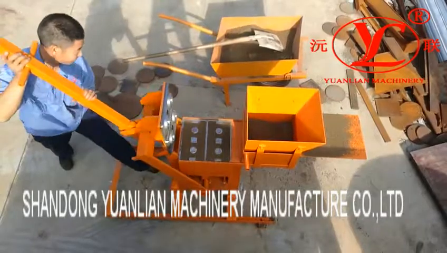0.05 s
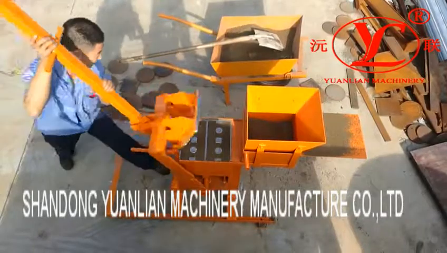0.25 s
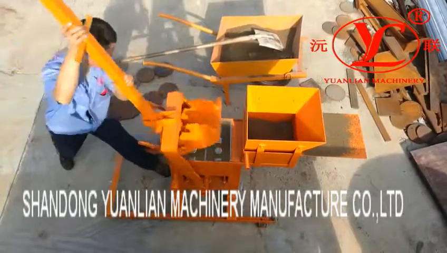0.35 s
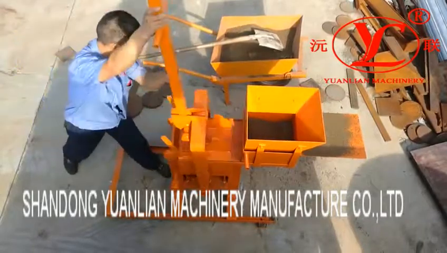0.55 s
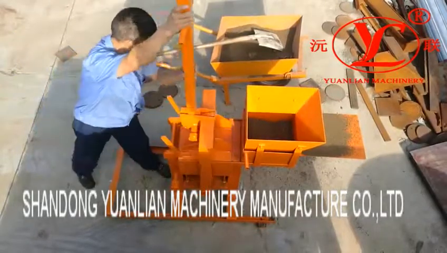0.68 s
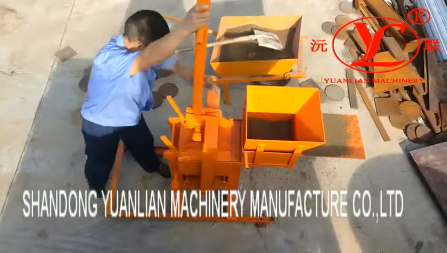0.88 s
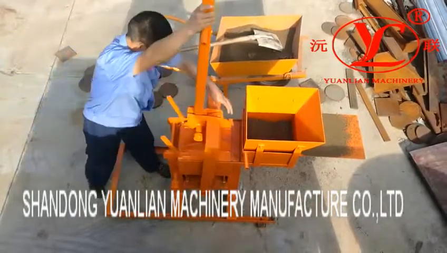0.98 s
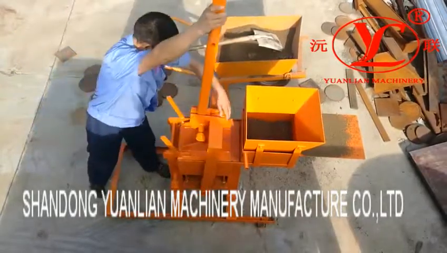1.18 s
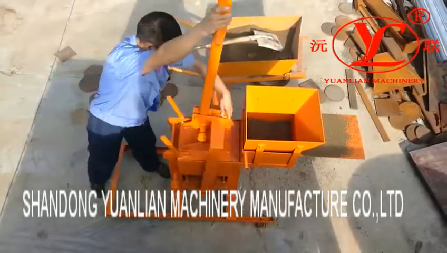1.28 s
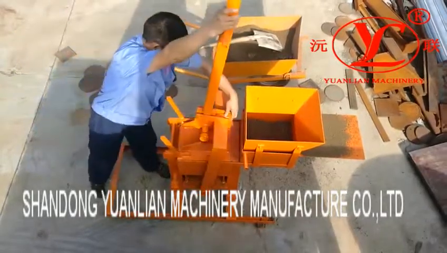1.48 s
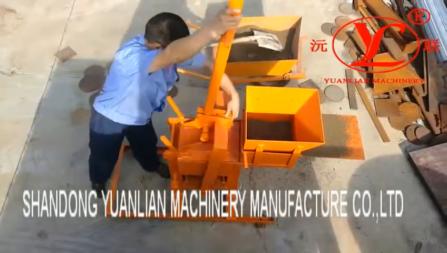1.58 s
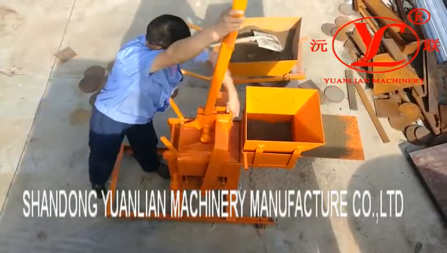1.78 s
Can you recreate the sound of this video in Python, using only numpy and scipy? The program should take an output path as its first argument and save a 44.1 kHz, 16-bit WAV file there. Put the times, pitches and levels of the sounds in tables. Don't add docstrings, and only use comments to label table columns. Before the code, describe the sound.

A heavy steel press lid slams onto its mould at about 0.24 s: several contacts crowd into one loud, clipped clank with crushed grit and a dull ground thud. Small bright bounce ticks follow at 0.36 s, faint knocks until 0.5 s, then a low ring sagging in pitch. A distant grinder hisses and squeals over low rumble throughout; two faint taps near 1.53 s. Open yard, short diffuse echo.

```python
import sys
import numpy as np
from scipy import signal
from scipy.fft import rfft, irfft, next_fast_len
from scipy.io import wavfile
from scipy.ndimage import uniform_filter1d

SR = 44100
rng = np.random.default_rng(int(sys.argv[2]) if len(sys.argv) > 2 else 0)


def unload_wav(signal):
    wavfile.write(
        sys.argv[1],
        SR,
        np.round(np.clip(np.atleast_2d(signal).T, -1, 1) * 32767).astype(np.int16),
    )


def attenuation_scalar(level_db):
    decades = np.asarray(level_db, float) / 20
    return 10 ** decades


N = 81585
M = next_fast_len(N)
T = np.arange(N) / SR
HZ = np.maximum(np.arange(M // 2 + 1) * SR / M, 1)

# pitch_hz, level_db
TOWN_SPECTRUM = [(12, -40), (20, -4.5), (87, -4.5), (231, -6.5), (264, -3), (582, -14), (897, -7),
                 (1100, -6.5), (1800, -10.5), (2340, -25), (3960, -120)]
TOWN_DB = -51

# pitch_hz, width_hz, level_db
DISC_LOW_MODES = [(1959, 8.5, 1), (2112, 18, 0), (2286, 24, -6.5), (2325, 26, -4), (2380, 6.2, -15),
                  (2436, 14, -6), (2560, 20, -30), (2770, 28, -9), (2880, 11, -16), (3457, 23.5, -4.5),
                  (3540, 45, -6.5), (3663, 32, -14), (4327, 17, -4), (4440, 9.3, -4.5)]
# pitch_hz, width_hz, level_db
DISC_HIGH_MODES = [(5347, 85, -0.5), (6160, 50, -7.5), (7487, 124, -2.5), (8210, 126, -8.5),
                   (10100, 235, -14), (10900, 230, -18), (11440, 170, -29)]
# start_s, length_s, pitch_hz, level_db
SING_EVENTS = [(0.035, 0.24, 2021, -32.5), (0.11, 0.4, 2000, -47), (0.14, 0.18, 2330, -41),
               (0.4, 0.35, 2380, -44.5), (0.548, 0.41, 1954, -48), (0.7, 0.12, 2480, -43),
               (0.723, 0.27, 2360, -46), (0.982, 0.091, 2862, -42.5), (1.097, 0.13, 917, -53.5),
               (1.136, 0.12, 2335, -44), (0.96, 0.083, 2414, -41.5), (1.33, 0.33, 2291, -43),
               (1.659, 0.11, 2250, -41), (0.41, .22, 3405, -45), (1.255, 0.044, 3490, -42.5),
               (0.093, .14, 3470, -43), (.13, 0.12, 3360, -47), (0.04, .15, 5240, -39.5),
               (.43, .18, 5230, -50), (.86, 0.084, 2465, -46), (1.13, .04, 2300, -53),
               (1.15, 0.065, 3700, -47), (1.05, 0.065, 3395, -46.5), (1.0, .1, 2095, -52.5)]
# pitch_hz, level_db
HISS_SPECTRUM = [(1500, -55), (1850, -10), (2300, -3.5), (3800, -8.5), (5000, -10.5), (8600, -13.5),
                 (11500, -32.5), (15400, -50)]
DISC_DB, DISC_HIGH_DB, HISS_DB = -40, -7, -40.5
DISC_SWAY_DB, DISC_SWAY_RATE_HZ = 2.5, 9
CHATTER_DB, CHATTER_RATE_HZ = 0.5, 110
FINE_DB, FINE_WIDTH_HZ, FINE_SWAY_DB = 5, 14, 4
SING_WIDTH_HZ, SING_ROUGH, SING_EDGE_S, SING_LAG_S = 10, 0.55, 0.029, 0.00031
CUT_LOW_HZ = 1590

# start_s, level_db, push_ms, base_weight_db, frame_weight_db
CONTACT_EVENTS = [(0.2375, -24, 0.35, -14, 4.5), (0.2404, -18, 0.15, -16, 2), (0.2448, -6, 0.21, -16.5, 1),
                  (0.2495, -8, 0.51, -16.5, -1), (0.2535, -13, 0.37, -14, -0.5), (0.2578, -8, 0.25, -7, 0),
                  (0.2605, -8.5, .2, -9, -2), (0.2635, -6.5, 0.25, -5.5, 0), (0.2665, -8, 0.18, -3.5, -1.5),
                  (0.2705, -11.5, 0.25, -7.5, -1), (0.2745, -12.5, 0.24, -7.5, -2.5),
                  (0.278, -11.5, 0.23, -8.5, -4.5), (0.283, -20.5, 0.27, -5, -5),
                  (0.2885, -20, 0.36, -4.5, 1.5), (0.3575, -31, 0.19, -18, -15),
                  (0.3645, -27.5, 0.11, -18, -15), (0.392, -30.5, 0.25, -3, -3), (0.407, -36, 0.3, 10, -1),
                  (0.445, -41, 0.39, 6.5, -13.5), (0.488, -47, 0.55, 8.5, -13),
                  (1.529, -36, 0.5, -10.5, -0.5), (1.549, -42.5, 0.43, -5, 0)]
BASE_PITCH_HZ = [50, 181, 255, 287, 305, 400, 553]
# level_db, t60_s, left_over_right_db
BASE_MODES = [(-8, 0.2, -2), (-15, 0.29, 2), (-15, 0.12, -1), (-3, 0.26, -1), (-4, 0.13, -1),
              (-20.5, 0.047, -2), (-20.5, 0.068, -1)]
FRAME_PITCH_HZ = [1035, 1083, 1153, 1198, 1403, 1529, 1607, 1776, 1962, 2063, 2190, 2240, 2401]
# level_db, t60_s, left_over_right_db
FRAME_MODES = [(-6.5, 0.07, 0), (-7.5, 0.074, -5), (2.5, 0.08, -1), (0, 0.14, -1), (-4, 0.06, 0),
               (-6, 0.048, 8), (-13, 0.066, 0), (-20, 0.12, 5), (-3.5, 0.087, 0), (-10.5, 0.073, -3),
               (-5.5, 0.054, -3), (-4.5, 0.12, 8), (-1.5, 0.11, 4.5)]
LID_PITCH_HZ = [2467, 2855, 3280, 3755, 3985, 4335, 4780, 5060, 5800]
# level_db, t60_s, left_over_right_db
LID_MODES = [(-5.5, 0.09, 4), (-8, 0.065, 7.5), (-15, 0.05, 3), (-9, .045, -7), (-4, 0.05, -2.5),
             (-9.5, 0.04, 0), (-4.5, 0.051, 5.5), (-13, 0.046, -7), (-15.5, .04, -4)]
STEEL_DB, STEEL_LOW_HZ, MODE_SCATTER_DB = -35, 163, 3

# pitch_hz, level_db
GRIT_SPECTRUM = [(100, -30), (287, -7), (725, -17.5), (1150, -6), (2410, -3.5), (3240, -11), (5000, -12),
                 (10500, -22), (15400, -40)]
GRIT_DB, GRIT_T60_S, GRIT_RISE_S, GRIT_SPIKE_DB = -28.5, 0.025, 0.002, 2

# pitch_hz, level_db
THUD_SPECTRUM = [(60, -44), (130, -21), (190, -1), (300, 3), (450, -7), (800, -11.5), (1500, -14),
                 (2500, -50)]
# start_s, level_db, t60_s
LOW_RUMBLE_TAIL = (0.34, -20, 1.6)
THUD_DB, THUD_T60_S, THUD_SQUEEZE = -40, 0.35, 0.47

# start_s, level_db
TICK_EVENTS = [
    (.3575, -27),
    (.3645, -24),
    (.369, -34),
]
TICK_T60_S, TICK_LOW_HZ = 0.028, 2200

# start_s, from_hz, to_hz, glide_s, level_db, t60_s
BASE_SAG = (0.57, 302.5, 268, 0.23, -41.5, 1.3)

YARD_DB, YARD_T60_S, YARD_GAP_S = -24, 0.58, 0.022
YARD_LOW_HZ, YARD_TOP_HZ = 146, 2540

# pitch_hz, likeness (-1 to 1)
FAR_LIKENESS = [(60, 1.0), (130, 1.3), (290, 0.35), (640, -0.06), (1410, -0.33), (3090, 0.05),
                (6800, -0.02), (15000, -0.04)]
# pitch_hz, left_over_right_db
FAR_PORT_DB = [(60, 1), (110, -1), (200, 0), (380, -1.5), (700, -4), (1290, 0), (2380, 11.5), (4390, -2.5),
               (8110, 2), (15000, -4)]
# pitch_hz, likeness (-1 to 1)
NEAR_LIKENESS = [(60, .98), (300, .97), (600, .75), (1200, .9), (2000, .5), (3100, 0), (15000, 0)]
# pitch_hz, left_over_right_db
NEAR_BALANCE_DB = [(60, 0), (380, -1), (700, 1), (1290, 0), (2380, 7), (4390, -2), (8110, -1), (15000, -3)]
NEAR_LAG_S = 0.00007
# start_s, gain_db
RECORDER_GAIN = [(0, 9.5), (.235, 8.5), (.29, 3.5), (.5, 4.5), (.8, 1), (1.2, 2), (1.85, 2)]
CLIP_AT = 1


def along(table):
    table = np.array(table, float)
    return np.interp(np.log(HZ), np.log(table[:, 0]), table[:, 1])


def level(x, db):
    return x * attenuation_scalar(db) / np.sqrt(np.mean(x ** 2))


def colour(x, table):
    return irfft(rfft(x, M) * attenuation_scalar(along(table)), M)[..., :N]


def decay(start_s, db, t60_s):
    return (T > start_s) * attenuation_scalar(db - 60 * np.maximum(T - start_s, 0) / t60_s)


def walk(rate_hz):
    k = int(SR / rate_hz)
    held = np.repeat(rng.standard_normal(512)[:N // k + 1], k)
    return 1.3 * uniform_filter1d(uniform_filter1d(held, k), k)[:N]


def ring(x, hz, t60_s):
    r = np.exp(-np.log(1000) / (max(t60_s, 0.003) * SR))
    w = 2 * np.pi * hz / SR
    return signal.lfilter([0, r * np.sin(w)], [1, -2 * r * np.cos(w), r * r], x)


def hum(noise, hz, width_hz):
    return level(ring(noise, hz, np.log(1000) / (np.pi * max(width_hz, 2))), 0)


def pair(likeness, shape=1, gate=1):
    c = np.clip(along(likeness), -1, 1)
    mid, side = rfft(rng.standard_normal((2, N)) * gate, M) / np.sqrt(2)
    sign = np.array([[1], [-1]])
    both = mid * np.sqrt(1 + c) + side * np.sqrt(1 - c) * sign
    return irfft(shape * both, M)[:, :N]


def ports(x, table, lag_s):
    port = attenuation_scalar(along(table) / 2) * np.exp(-1j * np.pi * HZ * lag_s)
    return irfft(rfft(x, M) * np.array([port, 1 / port]), M)[:, :N]


def town():
    rumble = colour(pair(FAR_LIKENESS), TOWN_SPECTRUM + [(2600, -60)])
    return level(rumble, TOWN_DB) * attenuation_scalar(0.6 * walk(5.8))


def disc():
    cut = pair(FAR_LIKENESS)
    high = [(hz, width_hz, db + DISC_HIGH_DB) for hz, width_hz, db in DISC_HIGH_MODES]
    total = 0
    for hz, width_hz, db in DISC_LOW_MODES + high:
        swell = attenuation_scalar(db + 10 * np.log10(width_hz) + DISC_SWAY_DB * walk(DISC_SWAY_RATE_HZ))
        total = total + swell * hum(cut, hz, width_hz)
    return level(total, DISC_DB)


def fine_modes():
    k = int(FINE_WIDTH_HZ * M / SR)
    thicket = uniform_filter1d(uniform_filter1d(rng.standard_normal(len(HZ)), k), k)
    shape = attenuation_scalar(along([(1200, -39)] + HISS_SPECTRUM) + FINE_DB * thicket / thicket.std())
    return pair(FAR_LIKENESS, shape) * attenuation_scalar(FINE_SWAY_DB * walk(5.89))


def hiss():
    total = sum(fine_modes() for _ in range(4))
    total = total / uniform_filter1d(np.abs(total).mean(axis=0), SR // 8)
    return level(total, HISS_DB)


def grinder():
    cut = (disc() + hiss()) * attenuation_scalar(CHATTER_DB * walk(CHATTER_RATE_HZ))
    return signal.sosfilt(signal.butter(4, CUT_LOW_HZ, "high", fs=SR, output="sos"), cut)


def whistle(noise, hz):
    line = np.sqrt(2) * np.sin(2 * np.pi * hz * T)
    return level(line + SING_ROUGH * hum(noise[:1], hz, SING_WIDTH_HZ), 0)


def singing_disc():
    scrape = pair(FAR_LIKENESS)
    total = 0
    for start_s, length_s, hz, db in SING_EVENTS:
        inside_s = np.minimum(T - start_s, start_s + length_s - T)
        gate = np.clip(inside_s / SING_EDGE_S + 0.5, 0, 1)
        total = total + attenuation_scalar(db) * whistle(scrape, hz) * gate
    return total


def sag():
    start_s, from_hz, to_hz, glide_s, db, t60_s = BASE_SAG
    since = np.maximum(T - start_s, 0)
    hz = np.interp(since, [0, glide_s], [from_hz, to_hz])
    swell = np.minimum(since / 0.044, 1) * attenuation_scalar(db - 60 * since / t60_s + 3 * walk(20))
    return swell * np.sin(2 * np.pi * np.cumsum(hz) / SR)


def ticks():
    gate = sum(decay(start_s, db, TICK_T60_S) for start_s, db in TICK_EVENTS)
    spectrum = [(TICK_LOW_HZ / 2, -30), (TICK_LOW_HZ, 0), (6000, -3), (15000, -20)]
    return pair(NEAR_LIKENESS, attenuation_scalar(along(spectrum)), gate)


def thud():
    shudder = decay(*LOW_RUMBLE_TAIL)
    for start_s, db, _, base_db, _ in CONTACT_EVENTS:
        shudder = shudder + decay(start_s, THUD_SQUEEZE * (db + base_db), THUD_T60_S)
    return level(pair(NEAR_LIKENESS, attenuation_scalar(along(THUD_SPECTRUM)), shudder), THUD_DB)


def grit():
    spray = np.zeros(N)
    for start_s, db, *_ in CONTACT_EVENTS:
        since = np.maximum(T - start_s, 0)
        spray += np.minimum(since / GRIT_RISE_S, 1) * attenuation_scalar(db - 60 * since / GRIT_T60_S)
    spikes = attenuation_scalar(GRIT_SPIKE_DB * rng.exponential(size=N))
    return level(pair(NEAR_LIKENESS, attenuation_scalar(along(GRIT_SPECTRUM)), spikes * spray), GRIT_DB)


def steel():
    pitches_hz = BASE_PITCH_HZ + FRAME_PITCH_HZ + LID_PITCH_HZ
    modes = BASE_MODES + FRAME_MODES + LID_MODES
    contacts, base = np.array(CONTACT_EVENTS), len(BASE_MODES)
    size = (len(contacts), len(modes))
    strength = attenuation_scalar(MODE_SCATTER_DB * rng.standard_normal(size))
    strength[:, base:] *= np.sign(rng.standard_normal(size))[:, base:]
    strength[:, :base] *= attenuation_scalar(contacts[:, 3:4])
    strength[:, base:base + 8] *= attenuation_scalar(contacts[:, 4:])
    push = np.zeros((len(contacts), N))
    for row, (start_s, db, push_ms, *_) in enumerate(CONTACT_EVENTS):
        since, tau_s = np.maximum(T - start_s, 0), push_ms / 4000
        push[row] = attenuation_scalar(db) * since * np.exp(-since / tau_s) / tau_s ** 2 / SR
    total = np.zeros((2, N))
    for k, (hz, (db, t60_s, pan_db)) in enumerate(zip(pitches_hz, modes)):
        mode = level(ring(strength[:, k] @ push, hz, t60_s), db + STEEL_DB)
        total += attenuation_scalar(np.array([[pan_db], [-pan_db]]) / 2) * mode
    return signal.lfilter(*signal.butter(2, STEEL_LOW_HZ, "high", fs=SR), total)


def yard(x):
    tail = pair(NEAR_LIKENESS, 1, (T > YARD_GAP_S) * attenuation_scalar(-60 * T / YARD_T60_S))
    band = signal.butter(1, [YARD_LOW_HZ, YARD_TOP_HZ], "band", fs=SR)
    tail = level(signal.lfilter(*band, tail), 0) / np.sqrt(N)
    mono = x.mean(axis=0, keepdims=True)
    return attenuation_scalar(YARD_DB) * signal.fftconvolve(mono, tail, axes=1)[:, :N]


def slam():
    near = ports(steel(), NEAR_BALANCE_DB, NEAR_LAG_S) + ports(grit(), NEAR_BALANCE_DB, 0)
    return near + thud() + yard(near)


def scene():
    gain = attenuation_scalar(np.interp(T, *np.array(RECORDER_GAIN).T))
    far = ports((town() + grinder()) * gain, FAR_PORT_DB, 0)
    sings = ports(singing_disc(), FAR_PORT_DB, SING_LAG_S)
    return far + sings + sag() + ticks() + slam()


def band_limit(x):
    return signal.sosfilt(signal.butter(12, 15570, fs=SR, output="sos"), x)


def record(dry):
    mix = np.clip(dry, -CLIP_AT, CLIP_AT)
    return band_limit(mix)


dry = scene()
out = record(dry)
unload_wav(out)
```